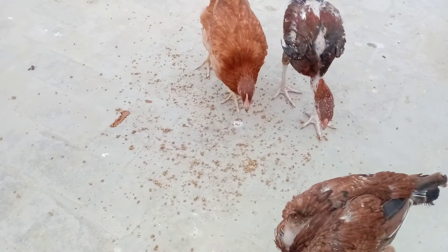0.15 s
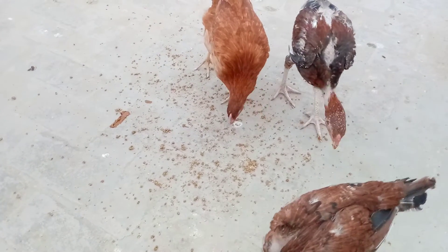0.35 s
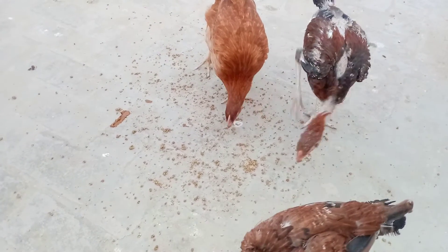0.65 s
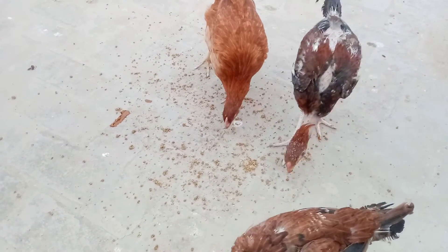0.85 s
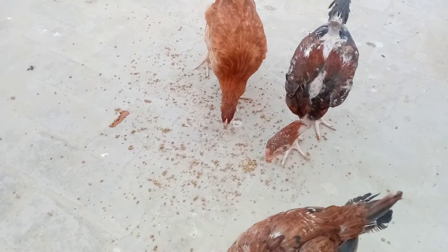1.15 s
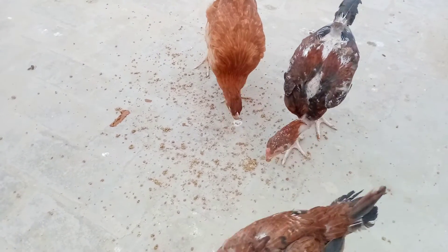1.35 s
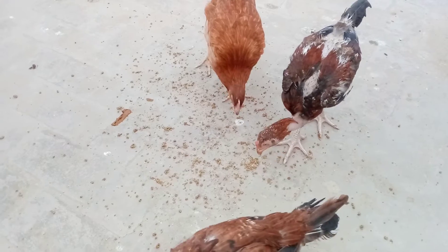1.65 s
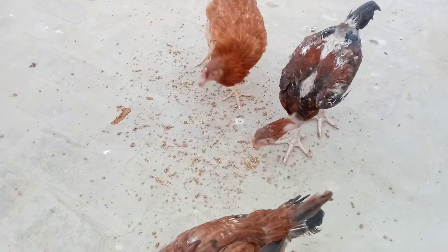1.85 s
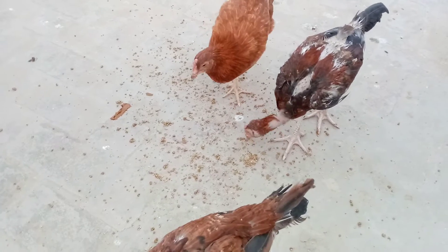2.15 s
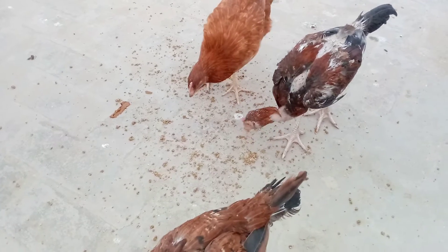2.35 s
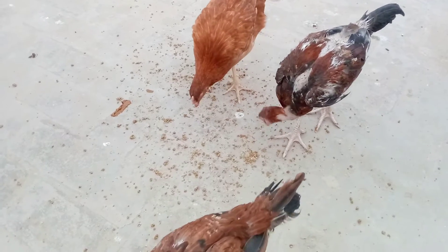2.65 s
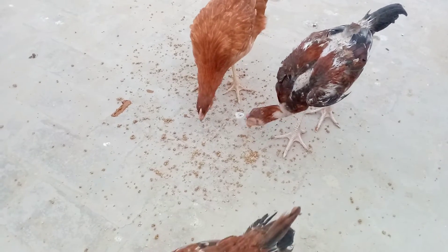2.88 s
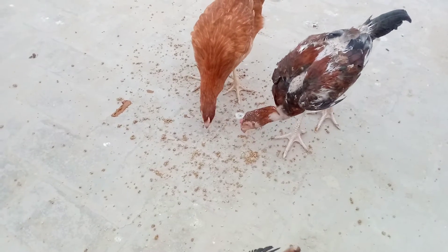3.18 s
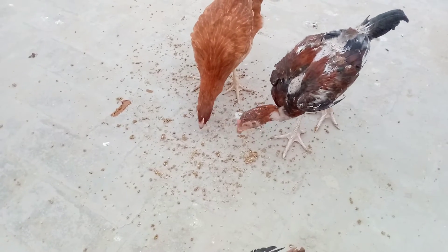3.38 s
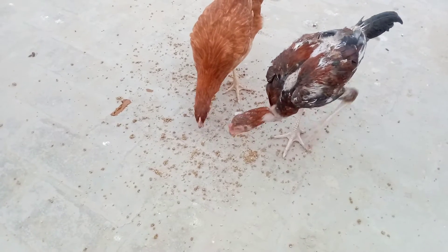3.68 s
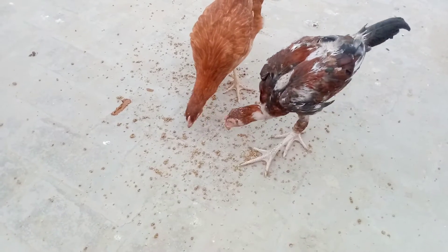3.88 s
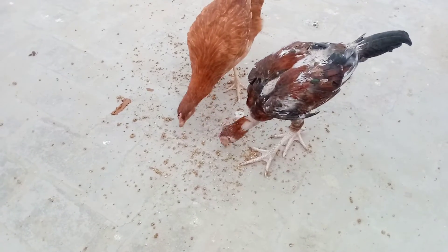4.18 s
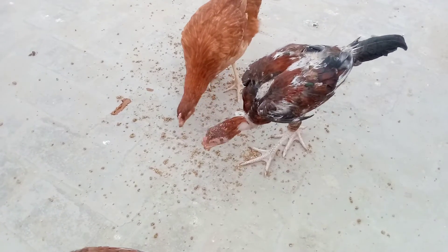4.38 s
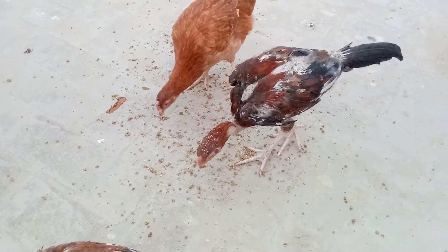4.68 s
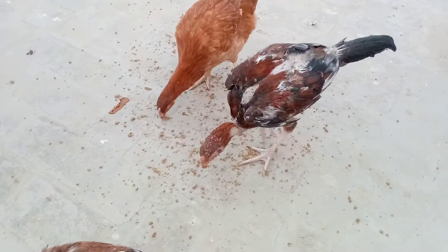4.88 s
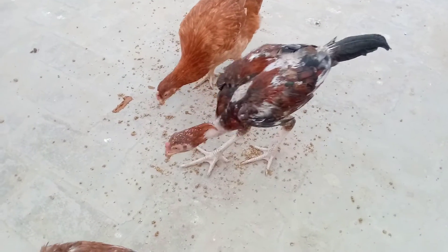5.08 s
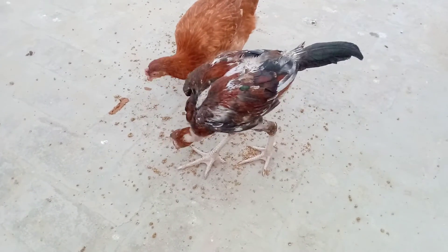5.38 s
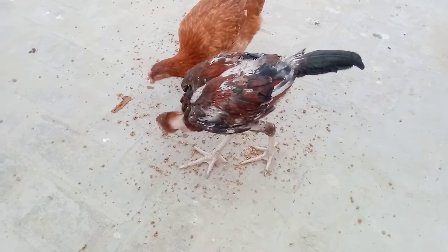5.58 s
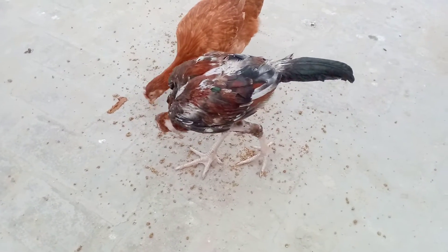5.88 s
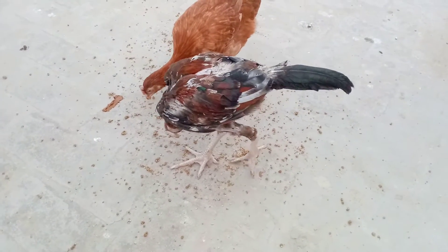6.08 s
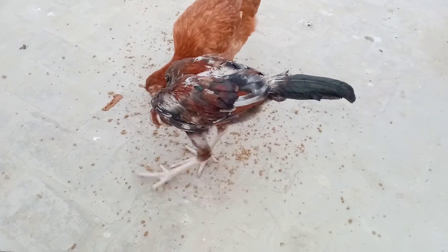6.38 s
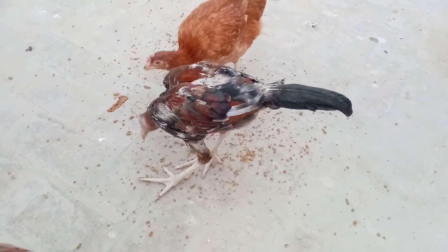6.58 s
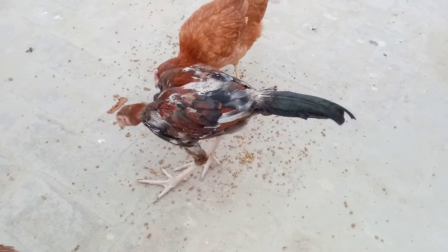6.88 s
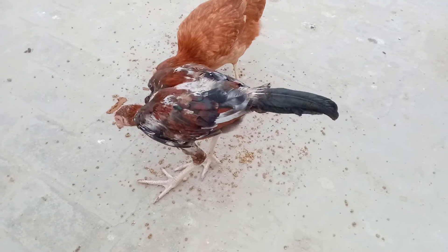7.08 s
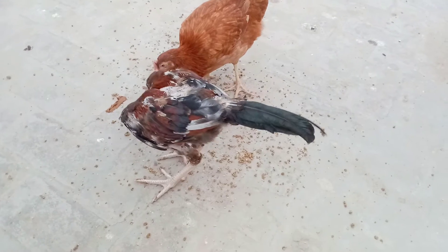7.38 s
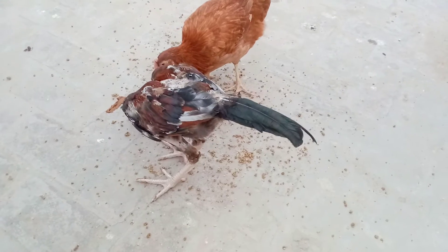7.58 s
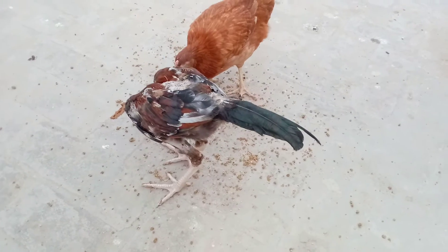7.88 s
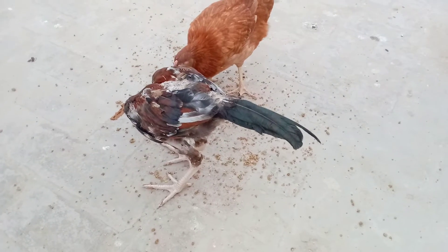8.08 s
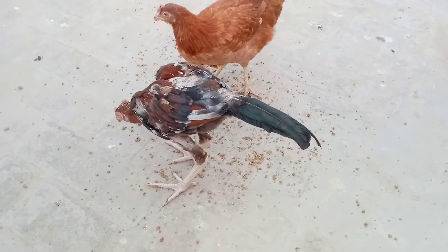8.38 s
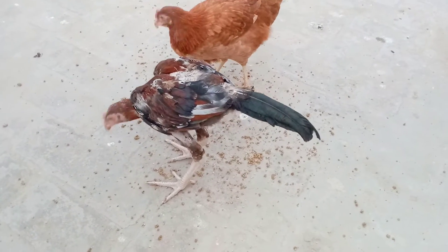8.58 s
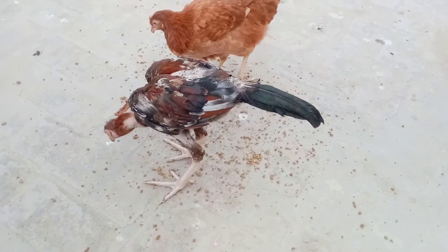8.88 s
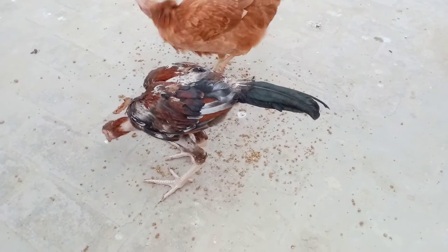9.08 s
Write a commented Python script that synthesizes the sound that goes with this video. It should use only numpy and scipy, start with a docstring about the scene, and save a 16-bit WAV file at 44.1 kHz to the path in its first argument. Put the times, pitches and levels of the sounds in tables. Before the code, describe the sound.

From the start, young chickens and small birds give short, high, gliding peeps and raspy chirps at uneven intervals, fairly close, with a brief ring off the walls of a concrete yard. Beaks tap the hard floor in light, irregular clicks through the first three seconds and again from about 6 to 9 seconds. Underneath, a distant engine throbs low, along with soft outdoor air and a faint, faraway flock. Near 2.7 seconds a hen squawks softly, and the chirps flare up until about 3.5 seconds. From 3.6 seconds the engine climbs in pitch, then fades by 6 seconds to a weaker rumble. The hen gives her loudest short squawk at about 6.3 seconds. The sharpest peep comes near 8 seconds and the hardest tap at 8.5, before a long, faint squawk closes at around 9 seconds.

```python
"""A walled concrete yard. From the start, young chickens and small birds whistle peeps and rasp out chirps
while beaks tap the floor, all ringing between the walls over a far engine's throb and a distant flock.
Near 3 s a hen squawks softly and the calls flare up. From 3.6 s the exhaust tones climb, fading by 6 s,
and the hen gives her loudest squawk. The sharpest peep comes near 8 s; a long, faint squawk closes."""
import sys
import numpy as np
from scipy import signal
from scipy.fft import rfft, irfft, next_fast_len
from scipy.io import wavfile
from scipy.ndimage import uniform_filter1d, map_coordinates

SR = 44100
rng = np.random.default_rng(int(sys.argv[2]) if len(sys.argv) > 2 else 0)


def store_pcm(level_fs):
    """Save levels as 16-bit WAV."""
    pcm = np.round(np.clip(level_fs, -1, 1) * 32767).astype(np.int16)
    wavfile.write(sys.argv[1], SR, np.atleast_2d(pcm).T)


N = 407484

# Fader moves for road and exhaust noise. Each row: time in seconds, then boom, bark and deep band in dB.
RUMBLE_LEVELS = [(0.0, -24.5, -54.5, -56), (0.1, -46, -50, -68), (0.36, -46, -51, -57),
                 (0.64, -44, -67, -58.5), (0.69, -42, -70.5, -41), (1.0, -42, -64, -66),
                 (1.13, -35, -62, -42.5), (1.23, -34, -73, -58), (1.44, -34.5, -52.5, -52),
                 (1.7, -31, -53.5, -62), (1.72, -44.5, -53.5, -52), (2.24, -32.5, -47.5, -66),
                 (2.65, -39.5, -57.5, -46.5), (2.98, -43, -67.5, -58), (3.34, -36.5, -61, -50.5),
                 (3.73, -42.5, -57.5, -63), (3.94, -37.5, -62.5, -56), (4.19, -34, -55.5, -62),
                 (4.35, -40, -56, -48), (4.61, -42.5, -56, -60), (4.86, -33.5, -47, -53.5),
                 (5.71, -35.5, -51.5, -53.5), (5.92, -53, -55.5, -51), (5.97, -46, -48, -68),
                 (6.1, -45, -64.5, -45.5), (7.46, -50, -69.5, -60.5), (7.77, -45, -69.5, -50.5),
                 (9.24, -52.5, -68.5, -59)]


def peeps():
    """Gliding whistles with side partials; hoarse notes tremble in pitch and break up in level."""
    # Each row: start and length in seconds, first and last pitch in Hz, level in dB,
    # sub-octave in dB against the note, hoarseness from 0 to about 1.
    notes = [(0.06, .097, 4265, 4020, -50, -4, 1), (0.066, 0.016, 6320, 6170, -49.5, -32, 0.3),
             (0.333, 0.015, 5110, 5220, -43.5, -32, .6), (0.346, 0.095, 3150, 3000, -42, -42.5, .8),
             (0.336, 0.077, 6300, 6030, -37, -34, 0.6), (0.419, .039, 4245, 3360, -47.5, -13, 0.51),
             (.442, .091, 1740, 2180, -57, -40, 0.6), (0.461, 0.034, 6600, 5860, -53, -6, 0.3),
             (0.519, 0.05, 3186, 2374, -49, -8, 0.77), (0.571, 0.099, 3980, 3860, -58.5, -40, .5),
             (.535, 0.017, 6100, 5400, -59, -22, .2), (.63, 0.018, 5900, 5280, -60, -20, .2),
             (.718, .027, 5660, 5200, -63, -20, 0.4), (0.583, 0.0138, 6150, 5690, -52.5, -14, 0.1),
             (0.666, 0.038, 5570, 5370, -60, -23, .2), (.784, 0.024, 3960, 3760, -45.5, -11.5, 0.88),
             (0.815, .15, 3220, 2530, -50.5, -38, 0.76), (1.074, 0.011, 4630, 5120, -46.5, -9, 1),
             (1.093, 0.018, 5660, 5780, -55, -28, .1), (1.155, 0.01, 5420, 5700, -47.5, -25.5, 0.3),
             (1.184, 0.11, 4590, 2376, -54, -17.5, 0.9), (1.192, 0.014, 5070, 5400, -52.5, 4, 0.8),
             (1.204, 0.071, 1845, 2000, -52.5, -29, 0.3), (1.315, 0.029, 1410, 1253, -51, -24, 0.6),
             (1.521, .16, 3880, 3375, -60, -28, 0.59), (1.666, 0.027, 3260, 3650, -54, -28, 0.6),
             (1.744, 0.045, 3700, 3860, -47.5, -29, 0.5), (1.835, 0.038, 5580, 5880, -55, -40, 0.7),
             (1.847, 0.022, 3780, 3860, -49.5, -8.5, 0.8), (1.924, .055, 4400, 4010, -45.5, -10, 1.02),
             (2.017, 0.045, 5300, 5000, -51, -45, 0.7), (2.019, 0.028, 3640, 3515, -43.5, -34, .8),
             (2.131, 0.059, 2120, 2790, -49.5, -39, 0.44), (2.161, 0.022, 4305, 3940, -43.5, -32, 1),
             (2.417, 0.038, 3380, 3440, -51.5, -8.5, 0.6), (2.398, 0.051, 5160, 4870, -52, -34, 0.9),
             (2.44, 0.085, 4484, 2870, -37.5, -21, 0.6), (2.498, 0.036, 5480, 4680, -53, 5.5, 0.57),
             (2.836, 0.082, 4486, 4160, -34, -17.5, 0.27), (2.891, 0.051, 3100, 3260, -33.5, -23, 0.42),
             (2.888, 0.097, 5970, 6440, -37.5, -44, 0.4), (3.239, .071, 5080, 4620, -55, -48, 0.1),
             (3.269, 0.11, 4430, 4360, -35.5, -16, 0.5), (3.314, 0.0975, 3566, 3213, -36.5, -20.5, 1.1),
             (3.854, 0.22, 1193, 1141, -63, -9, 0.67), (3.873, .05, 3570, 3570, -61.5, -36, 0.73),
             (3.93, .06, 6350, 5960, -65, -40, 0.56), (4.007, 0.055, 3175, 3000, -62.5, -37, 0.13),
             (3.973, 0.043, 4900, 3950, -55, -19, .8), (3.999, 0.073, 2078, 2015, -66, 5, 0.1),
             (4.163, 0.035, 3325, 3020, -51, -30, 1.1), (4.209, 0.19, 2287, 2580, -55, -39, .7),
             (4.261, 0.024, 4730, 4740, -41, -5, 0.58), (4.64, .1, 5150, 5050, -66, -32, .3),
             (4.286, .065, 5110, 3910, -48, -15, 0.66), (4.487, 0.01, 3360, 3150, -37.5, -21, 0.42),
             (4.501, 0.048, 4433, 4330, -42, -4, .8), (4.525, 0.032, 4050, 3860, -36, -31, 0.72),
             (4.571, 0.014, 3300, 3035, -34.5, -35, 1), (4.763, 0.018, 5280, 5010, -40.5, -31, 0.2),
             (4.773, 0.044, 4570, 3340, -44, -45, 0.76), (4.878, 0.025, 3210, 3220, -42.5, -32, .25),
             (4.924, .1, 1027, 888, -56, -11, .1), (5.171, 0.045, 5240, 3090, -43, -41, 0.88),
             (5.18, 0.016, 3780, 4030, -40, -37, 0.63), (5.265, 0.064, 2043, 2780, -58, -18, 0.9),
             (5.278, 0.11, 4210, 3830, -50.5, -17, 0.97), (5.286, 0.055, 5170, 5510, -52.5, -3, .9),
             (5.484, 0.048, 4050, 4220, -53.5, -33, 0.53), (5.606, 0.033, 4800, 3500, -55.5, -38, 1),
             (5.661, .19, 1108, 1234, -58.5, -8, 0.78), (5.698, 0.073, 2374, 2120, -52, -26, 0.8),
             (5.73, 0.042, 3125, 3050, -40, -26, .9), (5.748, 0.046, 6110, 5870, -57, -11, 0.6),
             (5.828, 0.026, 5450, 5280, -56, -8, 0.3), (5.942, 0.11, 3590, 3310, -53.5, -43, .9),
             (6.07, 0.075, 4590, 3040, -53.5, 3.5, 0.8), (6.257, 0.013, 4380, 4450, -43, -48, 0.36),
             (6.417, 0.033, 5760, 5060, -47, -25, 1.06), (6.469, .012, 4300, 4130, -31, -40, 0.7),
             (6.862, 0.025, 6700, 5900, -60, -24, 0.3), (7.055, 0.014, 5800, 5200, -44, -40, 1),
             (7.055, .13, 1904, 1760, -63, -40, 0.95), (7.058, 0.037, 3733, 3500, -42.5, -11.5, 0.54),
             (7.396, 0.048, 5770, 6370, -36, -19, 0.93), (7.428, 0.0634, 3425, 2920, -47, -47, 1.01),
             (7.579, 0.12, 1191, 1395, -58, -43, 0.58), (7.775, 0.035, 5380, 5370, -58, -40, 1),
             (7.799, 0.044, 4430, 3870, -55.5, -2.5, 0.74), (7.862, 0.043, 3070, 3880, -48, -23, 0.3),
             (7.89, .025, 5470, 4550, -44, -6, .1), (7.895, 0.046, 4456, 4860, -32, -13, 0.2),
             (7.92, 0.012, 2725, 5020, -31, -38, 0.1), (7.926, 0.0081, 4310, 4440, -23, -35, 0.03),
             (7.934, 0.093, 2133, 2200, -50, -46, 0.76), (7.95, 0.045, 3090, 2956, -43, -46, 1.11),
             (8.121, 0.0195, 4360, 4830, -48, -11, .2), (8.155, 0.023, 3680, 3640, -46.5, -15, 0.1),
             (8.194, 0.051, 2320, 1470, -62, -40, 1), (8.161, 0.029, 2930, 3000, -53, -40, 0.5),
             (8.65, 0.055, 5140, 3420, -49, -29, 0.63), (8.695, 0.032, 3070, 3090, -48.5, -40, 0.69),
             (8.815, 0.049, 1188, 1230, -60, -44, 1.05), (8.967, 0.053, 1166, 1190, -58.5, -40, 0.65),
             (9.037, .02, 5900, 5260, -64, -40, 0.4), (9.085, 0.048, 4200, 2950, -56.5, -1, 1.11),
             (9.123, .06, 3060, 2740, -61, -16, 1.1)]
    out = np.zeros(N)
    for start, length, hz0, hz1, db, sub_db, hoarse in notes:
        fifth_db, octave_db = (-12.5, -18) if hz0 < 2500 else (-31.5, -20.5)  # low notes are chesty
        u = np.linspace(0, 1, max(round(length * SR), 99))
        hz = hz0 * (hz1 / hz0) ** u * (1 + .055 * hoarse * wobble(500, len(u)))
        phase = 2 * np.pi * np.cumsum(hz) / SR
        tone = np.sin(phase) + amp(sub_db) * np.sin(phase / 2)
        tone += amp(fifth_db) * np.sin(1.5 * phase) + amp(octave_db) * np.sin(2 * phase)
        envelope = np.minimum(u * length / .0035, 1) * np.minimum((1 - u) * 2, 1)
        add(out, start, amp(db + 5.2 * hoarse * wobble(201, len(u))) * envelope * tone)
    return out


def rasps():
    """Air bursts hundreds of times a second through a sinking throat band; hard calls add sheen."""
    # Each row: start in seconds, level in dB, throat centre in Hz, sheen in dB against the band,
    # length in seconds, half-width of the band in octaves.
    chirps = [(.061, -72, 4300, -12, 0.034, 0.74), (.34, -55.5, 5010, -27.5, 0.043, 0.69),
              (0.461, -53.5, 2940, -13, 0.11, 0.4), (0.552, -59, 3140, -20, .023, 0.59),
              (0.829, -57, 2660, -14, 0.073, 0.17), (1.193, -62, 3840, -25, 0.17, .6),
              (1.262, -49, 2500, -12.5, 0.067, 0.27), (1.735, -54, 4070, -14, 0.06, .72),
              (1.918, -47.5, 3950, -7.5, 0.044, .37), (2.168, -49, 3800, -24, 0.019, 0.51),
              (2.201, -48.5, 2960, -19, 0.032, 0.43), (2.45, -54.5, 4100, -14, 0.037, 1),
              (2.514, -46, 3070, -24, 0.028, 0.37), (2.806, -49, 3630, -3.5, .14, 0.42),
              (2.907, -27.5, 4130, -5.5, 0.066, 0.22), (3.247, -48.5, 3560, 1.5, 0.19, .44),
              (3.333, -29, 4360, -2, 0.082, 0.19), (4.005, -66, 4340, -17.5, 0.045, .23),
              (4.2, -56, 2960, -14.5, 0.077, 0.57), (4.297, -44.5, 4170, -14.5, 0.026, 0.43),
              (4.503, -52.5, 3970, -17.5, 0.062, 0.89), (4.587, -45, 2820, -14.5, 0.036, 0.42),
              (4.808, -55, 3850, -32, 0.051, 1), (4.889, -48, 2830, -10, .047, 0.26),
              (5.203, -50.5, 3320, -23.5, 0.051, 0.24), (5.286, -47.5, 2770, -24, 0.051, 0.22),
              (5.628, -50, 3250, -15, 0.11, 0.11), (5.74, -54, 2780, -13.5, 0.084, 0.6),
              (5.914, -58.5, 4700, -13.5, 0.063, 0.2), (6.064, -44.5, 3220, -13, 0.071, .38),
              (6.361, -56, 4070, -14, .1, .8), (6.411, -59.5, 2320, -10, 0.31, 0.54),
              (6.455, -48, 3560, -3, .1, 0.68), (6.929, -59.5, 5200, 5, 0.23, 1),
              (7.055, -69.5, 3380, 9, 0.073, 1), (7.107, -52, 2870, -19, 0.066, 0.36),
              (7.387, -45, 5300, -2, .073, 0.66), (7.448, -48, 3700, -11.5, 0.072, 0.15),
              (7.548, -40.5, 4640, -10.5, .05, 0.66), (7.597, -41.5, 4570, -19, 0.11, 0.78),
              (7.664, -42, 5230, -22, 0.033, .13), (7.813, -59, 4200, -12, 0.051, 0.92),
              (7.881, -40.5, 4460, -0.5, 0.031, 0.22), (7.93, -44.5, 4200, 5.5, 0.039, 0.95),
              (8.01, -57, 2150, -9, 0.069, 0.73), (8.12, -58.5, 4460, 4, .036, 0.18),
              (8.204, -63.5, 3520, -13, 0.017, 1), (8.304, -53.5, 4900, 1, .07, 0.29),
              (8.457, -47.5, 5400, -11, 0.11, 0.86), (8.497, -30, 5070, -6.5, 0.016, .44),
              (8.665, -48, 4250, -27, 0.053, 0.22), (9.07, -71, 4080, -16, 0.033, .3)]
    out = np.zeros(N)

    def throat(air, centre, width):
        return unit(filtered(
            air, lambda f: amp(-6) ** (np.log2(f / centre + 1e-3) / width) ** 2 + amp(-29) * (f > 1100)))

    for start, db, hz, sheen_db, length, width in chirps:
        fall_octaves = .23 + 1.97 * length  # longer chirps sink further
        u = np.linspace(0, 1, round(np.clip(length, .01, .3) * SR))
        air = rng.standard_normal(SR // 3)[:len(u)] * amp(3.2 * wobble(587, len(u)))
        bright = throat(air, hz * 2 ** (fall_octaves / 2), width)
        dull = throat(air, hz / 2 ** (fall_octaves / 2), width)
        sinking = bright * np.cos(u * np.pi / 2) + dull * np.sin(u * np.pi / 2)
        sheen = unit(filtered(air * amp(1.3 * wobble(820, len(u))), lambda f: f > 6500))
        envelope = np.minimum(u * length / .006, 1) * np.sqrt(1 - u)
        add(out, start, amp(db) * envelope * (sinking + amp(sheen_db) * sheen))
    return out


def squawks(pitch_hz=430, attack_s=.01, release_s=.05):
    """Uneven glottal pulses mixed with breath noise ring the hen's throat."""
    # The hen's calls. Each row: start in seconds, length in seconds, level in dB.
    calls = [(2.667, 0.24, -61), (6.342, 0.23, -46), (8.721, 0.84, -70.5)]
    # Her throat resonances. Each row: centre in Hz, width in Hz, gain in dB.
    formants = [(760, 185, -7), (1187, 380, 0), (1796, 470, 9), (2410, 360, -9.5)]
    out = np.zeros(N)

    def throat(f):
        return sum((-1) ** k * amp(db) * resonance(f, hz, width) ** 2
                   for k, (hz, width, db) in enumerate(formants))

    for start, length, db in calls:
        t = np.arange(0, length, 1 / SR)
        cycles = np.cumsum(pitch_hz * (1 + .04 * wobble(120, len(t)))) / SR
        pulses = np.diff(np.floor(cycles), prepend=0)
        voice = unit(pulses) + .6 * rng.standard_normal(SR)[:len(t)]
        envelope = np.minimum(np.minimum(t / attack_s, (length - t) / release_s), 1)
        add(out, start, amp(db + 1.2 * wobble(20, len(t))) * envelope * unit(filtered(voice, throat)))
    return out


def beak_taps(t60_s=.012):
    """A beak on concrete: a short crack, coloured by the horn of the beak and a duller knock."""
    # Each row: start in seconds, peak level in dB, ring of the beak in Hz.
    pecks = [(0.341, -27.5, 6240), (1.079, -52, 5000), (1.676, -37, 3220), (1.749, -31.5, 3820),
             (1.92, -44, 4440), (2.026, -39, 3870), (2.162, -32.5, 4330), (2.803, -35.5, 3860),
             (3.243, -39.5, 3230), (6.258, -30, 4530), (6.93, -45, 5800), (7.058, -34.5, 3930),
             (7.399, -29.5, 5700), (7.553, -31.5, 3600), (8.288, -29, 4860), (8.462, -21, 5010),
             (9.082, -34.5, 4040)]
    out, t = np.zeros(N), np.arange(SR // 40) / SR
    for start, db, hz in pecks:
        crack = rng.standard_normal(len(t)) * amp(-60 * t / t60_s) * np.minimum(t / .0006, 1)
        tap = filtered(crack, lambda f: resonance(f, hz, 1100) ** 2
                       - .5 * resonance(f, 3000, 700) ** 2 + .1 * resonance(f, 9000, 9000))
        add(out, start, amp(db) * tap / np.abs(tap).max())
    return out


def walls(x, step):
    """Reverb off the walls; sources stand all over, so every step samples get a new tail."""
    # Each row: frequency in Hz, time to die away by 60 dB in seconds.
    decay_times = [(500, 0.39), (2500, 0.29), (5000, 0.21), (10000, 0.11)]
    out = np.zeros(N)
    crossfade, padded = np.hanning(2 * step), np.pad(x, (0, 2 * step))
    for start in range(0, N, step):
        hz, t, noise = signal.stft(rng.standard_normal(SR // 3), SR, nperseg=256)
        tail = signal.istft(noise * amp(-60 * t / along(decay_times, hz)[:, None]), SR, nperseg=256)[1]
        tail *= np.minimum(np.arange(len(tail)) / (.00084 * SR), 1)
        window = np.where((start == 0) & (np.arange(2 * step) < step), 1, crossfade)
        piece = padded[start:start + 2 * step] * window
        add(out, start / SR, signal.fftconvolve(piece, tail / np.linalg.norm(tail)))
    return out


def engine_rumble():
    """Road and exhaust noise: a boom and a higher bark throb together over a lumpy deep band."""
    # The EQ of each band. Each row: frequency in Hz, gain in dB.
    boom_eq = [(50, -62.5), (60, -38), (85, -17.5), (105, 14), (135, 17.5), (165, -0.5), (190, 0),
               (260, -100)]
    bark_eq = [(150, -100), (180, -6), (220, 1), (290, -1.5), (350, 0), (385, -19), (430, -41), (600, -120)]
    deep_eq = [(15, -30.5), (30, -18), (50, -13), (65, -4.5), (85, 1.5), (110, -40.5), (200, -120)]
    boom_db, bark_db, deep_db = curves(RUMBLE_LEVELS)
    boom = amp(boom_db - 3.5) * coloured(rng.standard_normal(N), boom_eq)
    bark = amp(bark_db) * coloured(rng.standard_normal(N), bark_eq)
    deep = amp(deep_db) * coloured(rng.standard_normal(N) * amp(2 * wobble(9)), deep_eq)
    throb, surge = amp(3 * wobble(7)), amp(4 * wobble(3.4))
    return throb * (boom + bark) + surge * deep


def exhaust(orders=(4, 5, 6, 7, 9, 12), hunting=.02423, fade_s=.08):
    """Multiples of the firing rate sing, loudest where the pipe rings, and fade at each gear change."""
    # One list per pull under throttle. Each row: time in seconds, firings a second, level in dB.
    pulls = [
        [(0, 23.4, -33.5), (.36, 24.3, -31.5), (.46, 25, -54), (.55, 24.5, -40)],
        [(1.1, 20.5, -41), (1.3, 20.5, -36.5), (1.5, 21.1, -34), (1.8, 20.6, -35.5), (2.1, 21, -38),
         (2.3, 22, -41), (2.6, 23, -38), (2.85, 23, -54.5)],
        [(3.6, 18.5, -36), (3.95, 19.6, -49.5), (4.25, 20.6, -38), (4.5, 21.6, -40), (4.62, 22.6, -45.5),
         (4.88, 24, -33.5), (5.1, 25.6, -39), (5.37, 29, -31), (5.55, 29.8, -27.5), (5.75, 30.3, -37),
         (5.9, 30, -55), (6.1, 29, -44)],
    ]
    # The pipe's resonances. Each row: frequency in Hz, gain in dB.
    pipe_eq = [(70, -19.5), (94, -24), (106, -3.5), (120, -8.5), (140, -3.5), (165, -7), (190, -32),
               (250, -27), (290, -16), (360, -25.5)]
    out = np.zeros(N)
    for pull in pulls:
        times, rates, levels = np.transpose(pull)
        t = np.arange(times[0], times[-1], 1 / SR)
        firing_hz = np.interp(t, times, rates) * (1 + hunting * wobble(8, len(t)))
        level_db = np.interp(t, times, levels)
        firings = np.cumsum(firing_hz) / SR
        onset = times[0] if times[0] > 0 else -fade_s  # the first pull is already under way
        fade = np.minimum(np.minimum(t - onset, times[-1] - t) / fade_s, 1)
        for k, offset in zip(orders, rng.random(len(orders))):
            db = level_db + along(pipe_eq, k * firing_hz) + 3 * wobble(6.17, len(t))
            add(out, times[0], np.sqrt(2) * fade * amp(db) * np.sin(2 * np.pi * (k * firings + offset)))
    return out


def far_birds(count):
    """Many faint, short, falling whistles at random moments and pitches."""
    out = np.zeros(N)
    for when, pitch, fall, length, strength in rng.random((count, 5)):
        u = np.linspace(0, 1, round((.012 + .03 * length) * SR))
        hz = 3400 * 1.9 ** pitch * (1 - .3 * fall * u)
        envelope = amp(11 * strength) * np.sin(np.pi * u ** .28)
        add(out, when * N / SR, envelope * np.sin(2 * np.pi * np.cumsum(hz) / SR))
    return out


def ambience():
    """The bed: outdoor air swelling with the engine's bark, a fuzzy fluttering whine, a blurred flock."""
    # Fader moves. Each row: time in seconds, whine level in dB, flock level in dB.
    bed_levels = [(0, -61.5, -66.5), (.5, -64.5, -63.5), (1, -71, -67), (1.5, -69.5, -70), (2, -61, -59.5),
                  (2.7, -71, -64.5), (3.7, -71.5, -66), (4.2, -70, -63), (5, -60.5, -59.5),
                  (5.8, -68, -58.5), (6.5, -62.5, -59.5), (6.7, -72, -67), (7.6, -72.5, -65.5),
                  (8.5, -77, -64), (8.9, -64.5, -64.5), (9.24, -65, -62.5)]
    # The EQ of each noise layer. Each row: frequency in Hz, gain in dB.
    air_eq = [(150, -24.5), (300, 0), (500, 3), (740, 0.5), (790, 4.5), (840, -2.5), (940, -2.5),
              (965, 2.5), (990, -3), (1600, -5.5), (2500, -15), (6000, -32)]
    whine_eq = [(800, -120), (1050, -42.5), (1180, -4.5), (1250, 5.5), (1320, -10), (1450, -43.5),
                (2000, -120)]
    flock_eq = [(1500, -25.5), (2200, 5), (3500, -7.5), (4600, -1), (5600, -6.5), (6500, -2.5),
                (9000, -4.5)]
    whine_db, flock_db = curves(bed_levels)
    bark_db = curves(RUMBLE_LEVELS)[1]
    air_db = -63 + .46 * (bark_db - bark_db.mean())
    whine = coloured(rng.standard_normal(N), whine_eq) * amp(3.5 * wobble(19))
    air = coloured(patchy_noise(depth_db=2.5), air_eq)
    whistles = far_birds(count=700)
    blur = coloured(patchy_noise(depth_db=3.5), flock_eq)
    flock = blur + amp(-3) * unit(whistles + amp(2) * walls(whistles, SR))
    return amp(air_db) * air + amp(whine_db) * whine + amp(flock_db) * flock


def amp(db):
    """dB to gain."""
    return 10 ** (np.asarray(db) / 20)


def unit(x):
    """Scaled to rms 1."""
    return x / np.sqrt(np.mean(x ** 2) + 1e-20)


def along(points, hz):
    """Reads (Hz, value) points on a log frequency axis."""
    freqs, values = np.transpose(points)
    return np.interp(np.log(hz + 1), np.log(freqs + 1), values)


def curves(rows):
    """One value per sample for each column after the time."""
    times, *columns = np.transpose(rows)
    return [np.interp(np.arange(N) / SR, times, column) for column in columns]


def wobble(rate, size=N):
    """A smooth random curve, rate knots a second."""
    knots = rng.standard_normal(int(N * rate / SR) + 4 if size == N else 400)
    return map_coordinates(knots, [np.arange(size) * rate / SR], mode="wrap")


def filtered(x, response):
    """x through a frequency response."""
    size = next_fast_len(len(x) + 8192)
    return irfft(rfft(x, size) * response(np.fft.rfftfreq(size, 1 / SR)), size)[:len(x)]


def coloured(x, eq):
    """x through an EQ curve, at rms 1."""
    return unit(filtered(x, lambda hz: amp(along(eq, hz))))


def patchy_noise(depth_db):
    """Noise with patches of random gain in time and frequency."""
    noise = signal.stft(rng.standard_normal(N), nperseg=512)[2]
    patches = uniform_filter1d(uniform_filter1d(rng.standard_normal(noise.shape), 2, 0), 16, 1)
    return signal.istft(noise * amp(depth_db * unit(patches)), nperseg=512)[1][:N]


def resonance(f, hz, width_hz):
    """A causal resonance of gain 1 at its centre."""
    return 1j * f * width_hz / (hz * hz - f * f + 1j * f * width_hz)


def add(track, start_s, sound):
    """Lays a sound into the track."""
    part = track[round(start_s * SR):][:len(sound)]
    part += sound[:len(part)]


def scene():
    """Birds and beaks, direct and off the walls, over the engine and the bed; mono."""
    birds = amp(1) * (peeps() + rasps() + squawks())
    beaks = beak_taps()
    reverb = walls(amp(1.5) * birds + amp(-1.5) * beaks, step=SR // 5)
    return (birds + beaks + reverb + engine_rumble() + exhaust() + ambience())[None]


def record(dry, top_hz=15550):
    """The microphone is dull above 6 kHz, lifts again near 15 kHz, hisses faintly and ends at top_hz."""
    # Its response and the colour of its hiss. Each row: frequency in Hz, gain in dB.
    mic_eq = [(5500, -0.5), (6200, -10), (7000, -17), (9000, -25), (10500, -35), (12000, -45.5),
              (13500, -30), (14800, -25), (16000, -16.5)]
    hiss_eq = [(3000, -9.5), (7000, -5), (9000, 1), (12500, 3.5), (14000, -0.5), (15000, 12), (16000, -6.5)]
    sound = filtered(dry[0], lambda hz: amp(along(mic_eq, hz)))
    hiss = amp(-86.5) * coloured(rng.standard_normal(N), hiss_eq)
    return filtered(sound + hiss, lambda hz: hz < top_hz)[None]


dry = scene()
out = record(dry)
store_pcm(out)
```